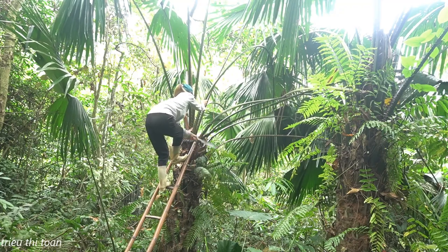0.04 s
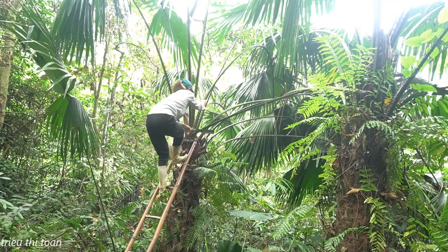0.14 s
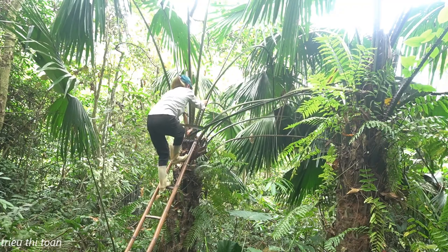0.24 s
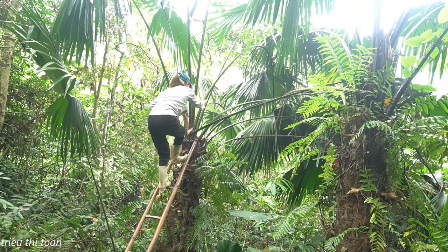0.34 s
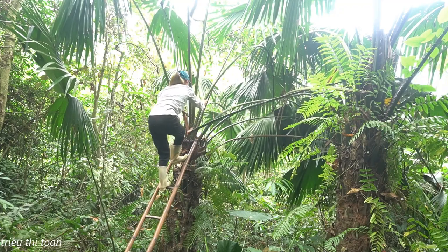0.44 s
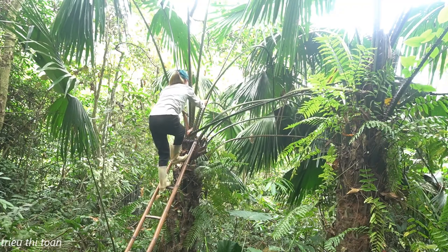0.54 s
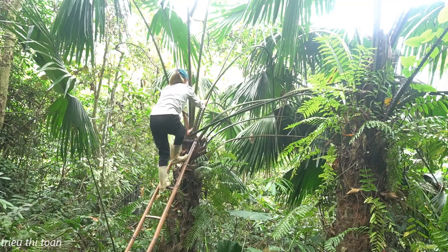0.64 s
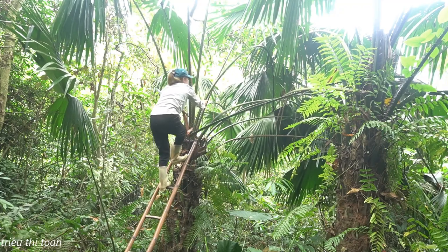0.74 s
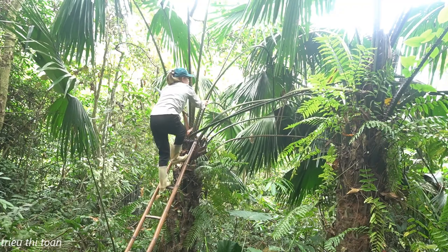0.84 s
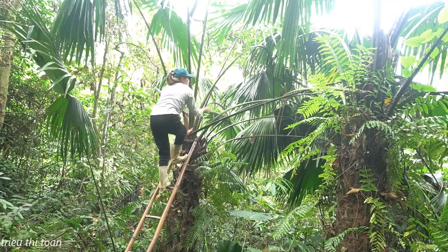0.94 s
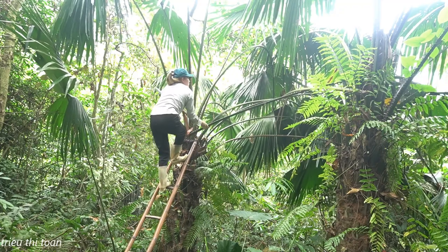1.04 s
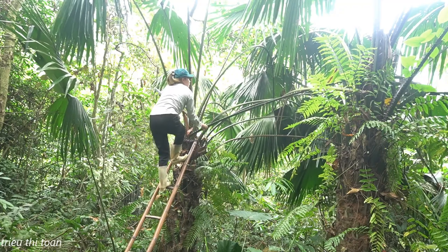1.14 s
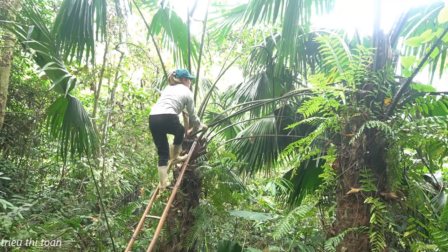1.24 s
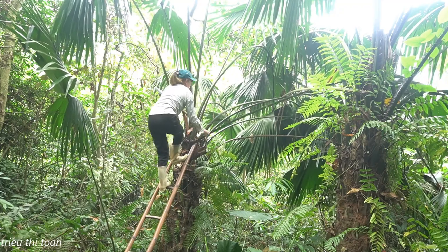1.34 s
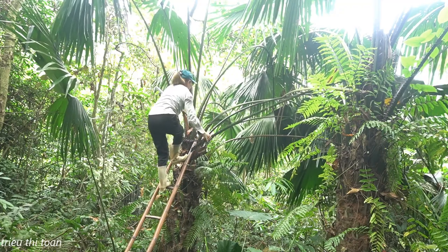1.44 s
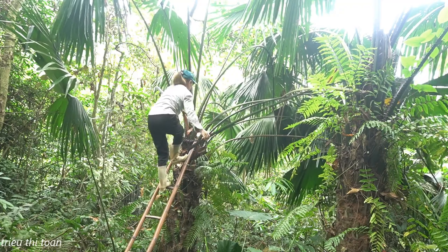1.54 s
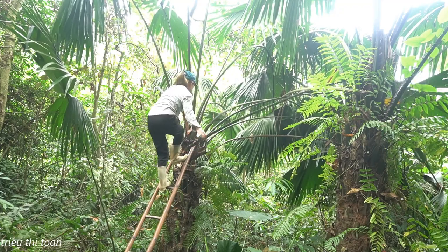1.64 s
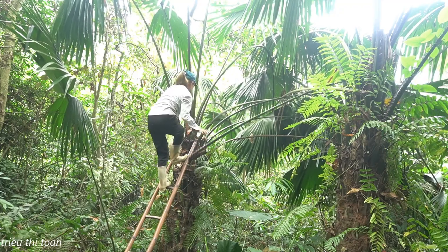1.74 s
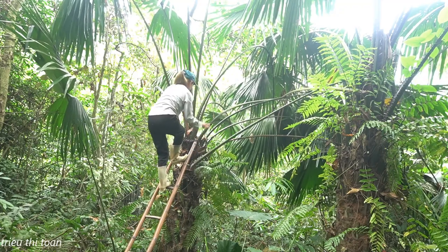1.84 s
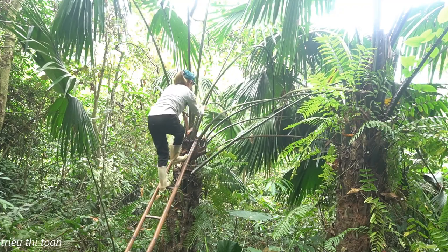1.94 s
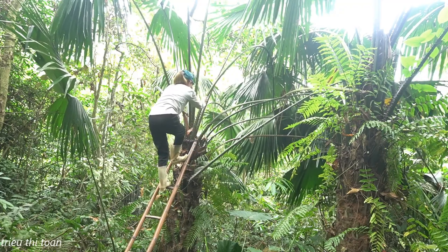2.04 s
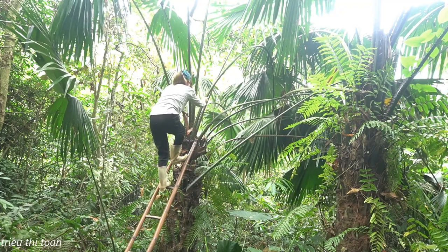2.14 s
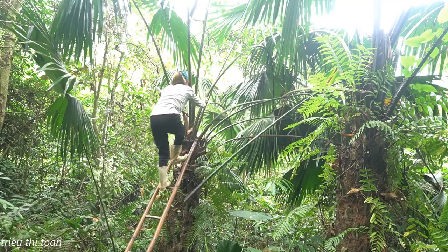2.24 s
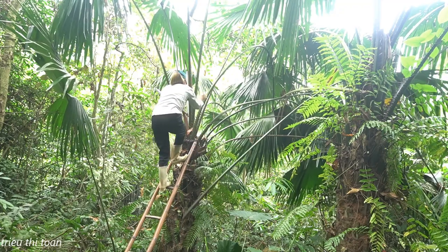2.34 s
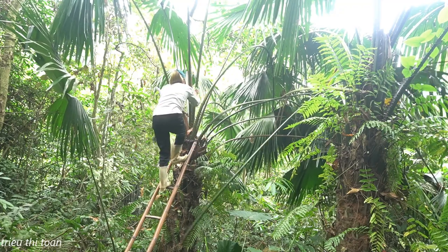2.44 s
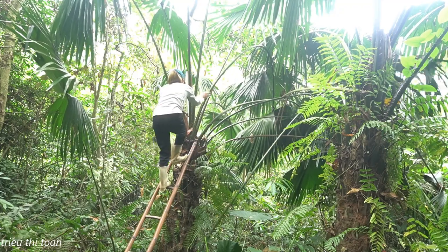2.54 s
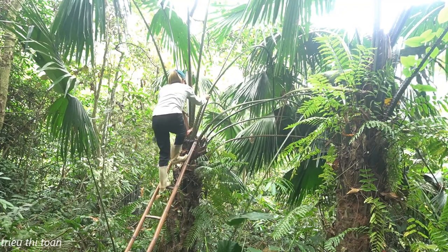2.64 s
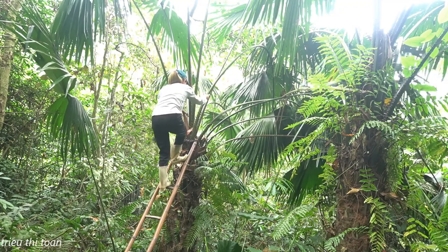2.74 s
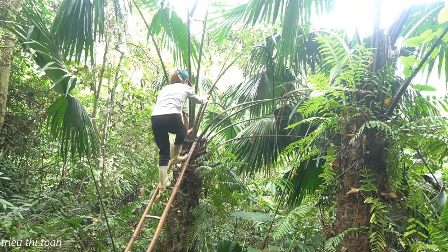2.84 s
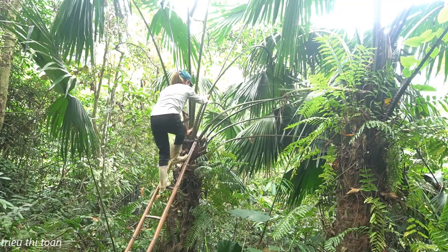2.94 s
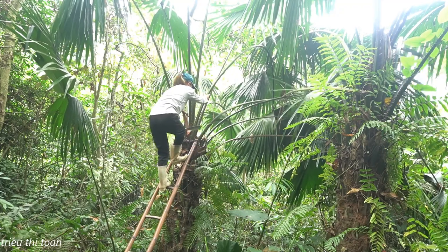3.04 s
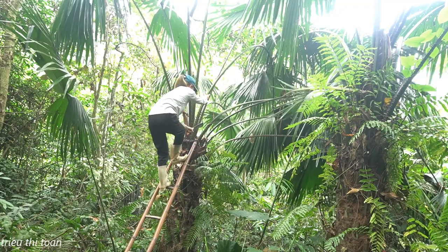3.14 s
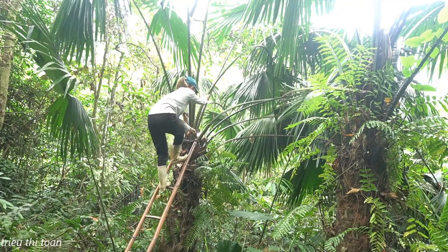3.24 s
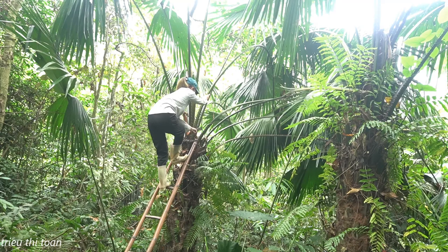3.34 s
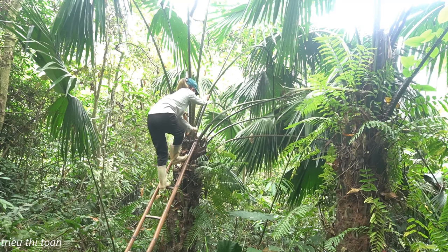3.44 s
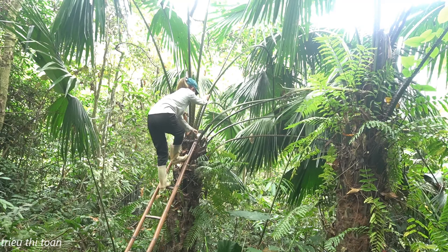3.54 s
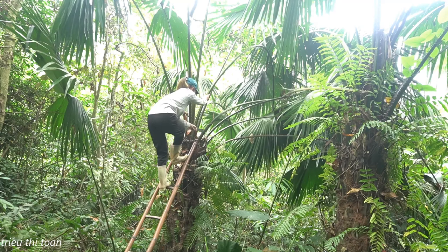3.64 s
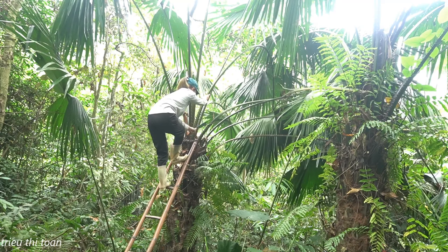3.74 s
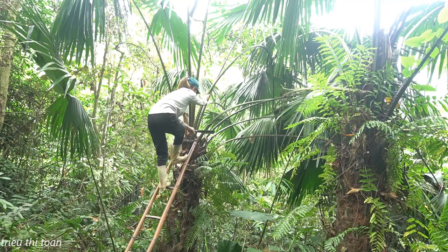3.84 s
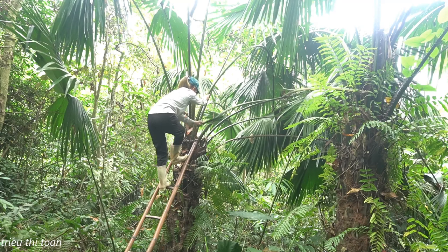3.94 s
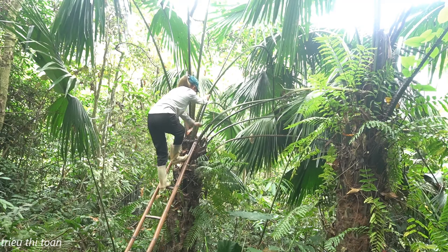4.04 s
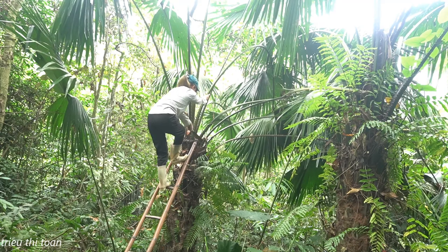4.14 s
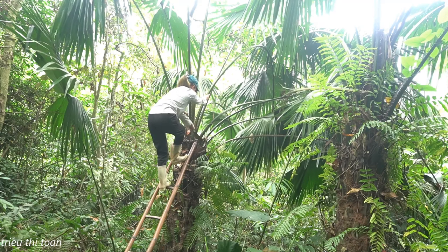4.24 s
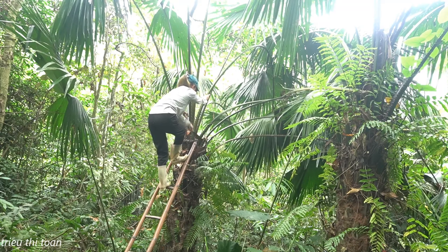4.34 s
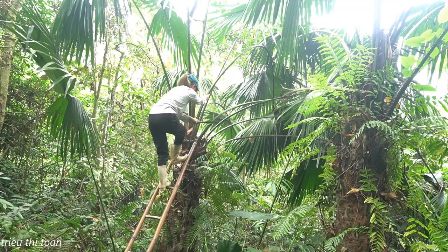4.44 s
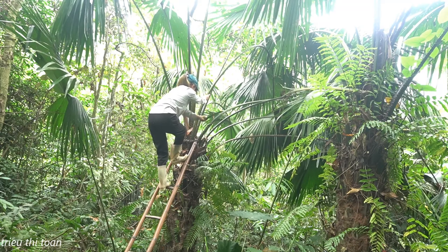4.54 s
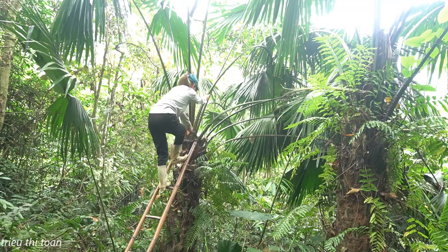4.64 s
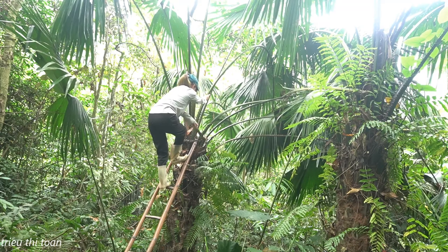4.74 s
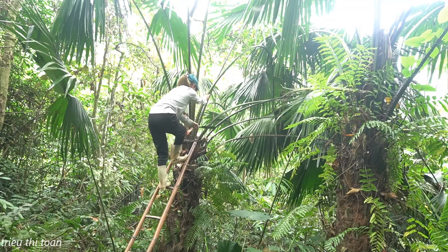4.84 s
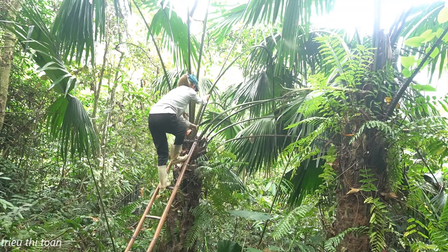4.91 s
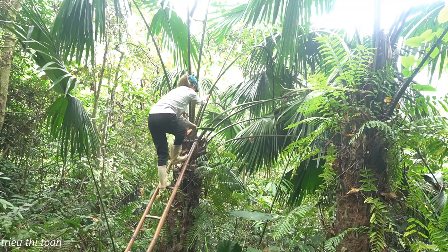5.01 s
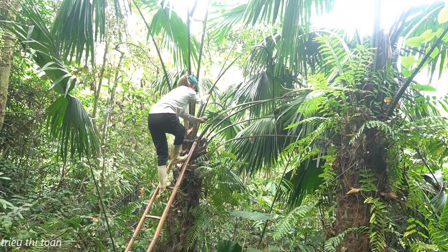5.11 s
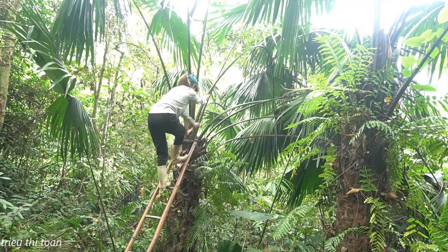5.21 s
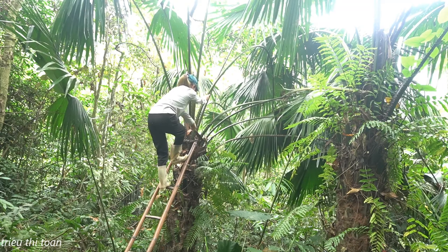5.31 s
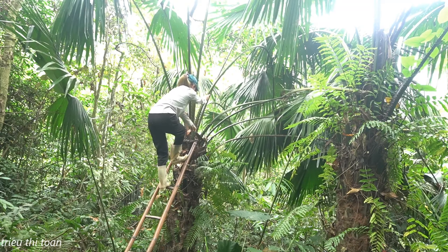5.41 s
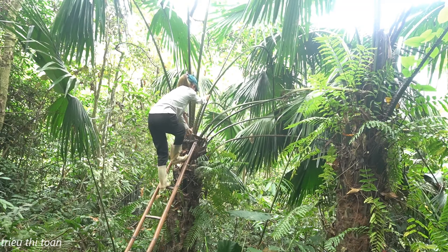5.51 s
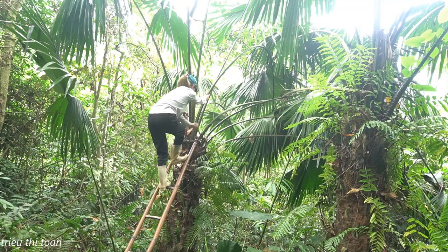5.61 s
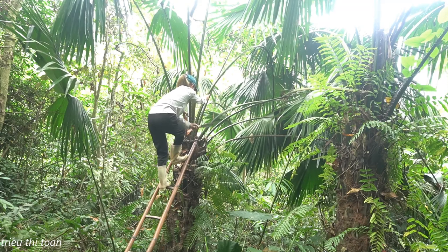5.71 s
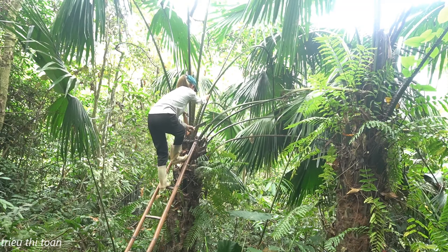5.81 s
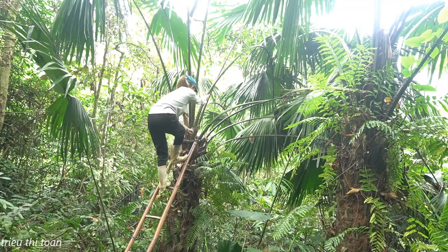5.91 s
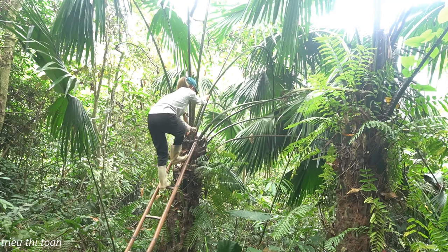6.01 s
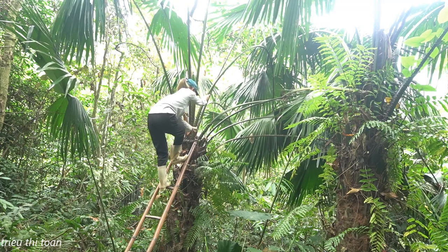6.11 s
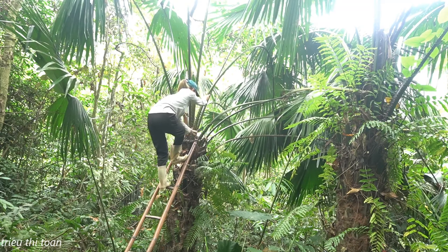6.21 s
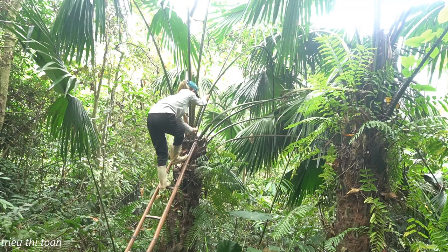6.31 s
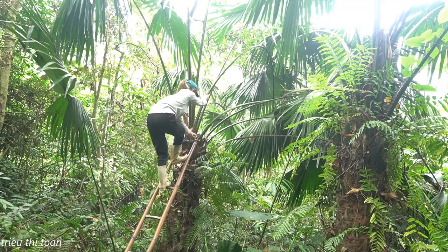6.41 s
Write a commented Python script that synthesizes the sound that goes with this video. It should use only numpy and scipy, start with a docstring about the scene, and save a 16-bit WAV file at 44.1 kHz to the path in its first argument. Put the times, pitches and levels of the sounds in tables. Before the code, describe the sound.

Outdoor stereo pickup among dense palms. Dry leaves drag and tick, fade, then rustle harder until a frond crashes down, leaning slightly right. After a short settling, sharp machete-like blows bite fibrous wood, each a bright tick, splitting crackle and hollow knock with a short leafy tail. Between late blows the blade rubs and small knocks clatter. Faint hiss, shrill insects and two distant early whistles sit underneath.

```python
"""Palm cutting in a forest

A worker on a ladder frees a palm frond, which slides and crashes down through the leaves (clumped grains
and stalk modes), then hacks at the next stalk with a long blade (tick, splitting fibres, steel ring).
Knocks excite stalk modes, snaps and swishes are bursts of resonant noise; both leave a dense decaying tail.
Behind lie filtered-noise air, two resonant bands of insects and two far gliding whistles."""
import sys
import numpy as np
from scipy import signal
from scipy.fft import rfft, irfft, next_fast_len
from scipy.io import wavfile

SR = 44100
rng = np.random.default_rng(int(sys.argv[2]) if len(sys.argv) > 2 else 0)


def gain_from_decibels(decibels):
    """Convert decibel values to linear amplitude factors."""
    exponent = np.asarray(decibels, float) / 20
    return 10 ** exponent


def to_wav(s):
    """Save 16-bit WAV."""
    ch = np.atleast_2d(s).T  # columns
    pcm = np.round(np.clip(ch, -1, 1) * 32767)  # PCM
    wavfile.write(sys.argv[1], SR, pcm.astype(np.int16))


N = 285327

# Forest air, a noise spectrum: pitch_hz [Hz], density_db [dB per Hz, relative]
AIR_SPECTRUM = [(20, -10), (50, -18), (86, -4.5), (220, -6), (480, -5), (1140, -4.5), (1500, -9),
                (3300, -9), (6500, -11), (8500, -13), (11000, -17), (15500, -13)]
# Insect bands, lower then higher: pitch_hz [Hz], width_hz [Hz, of each of two resonances in series]
INSECT_BANDS = [(8300, 1300), (13700, 1400)]
# Higher insects, which come and go: time_s [s], level_db [dB rms]
HIGH_INSECT_LEVEL = [(0, -76), (1.3, -82), (1.9, -55), (2.3, -53), (3.2, -64), (4.3, -77), (5.75, -61),
                     (5.9, -58), (6.47, -55)]
# Far whistles: start_s [s], loudest_s [s], end_s [s], first_hz [Hz], level_db [dB rms when loudest]
WHISTLES = [(0.506, 0.744, 0.83, 1380, -58), (1.031, 1.2, 1.37, 2830, -59)]
# Scattered tail: pitch_hz [Hz], t60_s [s], level_db [dB, relative]
SCATTER_TAIL = [(80, 0.84, -33), (212, 0.37, -11.5), (560, 0.32, -11.5), (1370, 0.49, -20),
                (3800, 0.75, -14), (10200, 0.36, -4.5)]
# Likeness of left and right, for near and for distant sound: pitch_hz [Hz], likeness [0 to 1]
NEAR_LIKENESS = [(60, 0.99), (180, 1), (550, 1), (1650, 0.94), (4970, 0.57), (15000, 0.075)]
AIR_LIKENESS = [(60, 1), (240, 0.79), (950, 0.1), (3770, 0.32), (15000, 0.22)]
# Balance of the dying tails: pitch_hz [Hz], left_over_right_db [dB]
TAIL_BALANCE = [(60, 0), (380, -1), (2380, -2.5), (15000, -1.0)]
# Frond dragging through foliage: time_s [s], rustle_db [dB], rattle_db [dB against the rustle]
DRAG_LEVELS = [(0.0, -50, -1), (0.03, -43.5, -2), (0.08, -49, -5), (0.25, -48, -5.5), (0.94, -72, -1),
               (1.35, -68, 0), (1.38, -44.5, 2), (1.42, -48, -3), (1.66, -50, -3.5), (1.82, -43, -2.5),
               (2.11, -47.5, -3.5), (2.18, -38, -5), (2.26, -47.5, -3), (2.46, -37.5, -4), (2.51, -32.5, 1),
               (2.74, -21, -3), (3.06, -44.5, -5), (3.07, -42, -7.5), (3.11, -49.5, -3), (3.4, -57.5, -7.5)]
# Balance of the frond, which falls to the right: pitch_hz [Hz], left_over_right_db [dB]
DRAG_BALANCE = [(60, -1), (180, 0.5), (550, -0.5), (1650, -4), (4970, -5.5), (15000, -3)]
# Modes of the loose frond's hollow stalk: pitch_hz [Hz], width_hz [Hz], level_db [dB, relative]
FROND_MODES = [(320, 220, -13), (540, 106, -0.5), (810, 100, -4), (1050, 246, 1.5), (1350, 180, -4),
               (1826, 280, -4.5), (2306, 810, -17)]
# Leaf rustle, a spectrum: pitch_hz [Hz], density_db [dB per Hz, relative]
LEAF_SPECTRUM = [(880, -10.5), (1500, -0.5), (1580, -6), (1900, -3), (2540, -3), (3030, -1.5), (4990, 0.5),
                 (11200, -1.5), (15500, -3)]
# Blade worked loose from the cut in strokes: start_s [s], length_s [s], level_db [dB, each of two parts]
RUB_STROKES = [(5.34, 0.063, -50), (5.387, 0.063, -40.5), (5.48, .072, -43.5)]
# Clearest snaps, ticks and short swishes of leaflets and fibres:
# start_s [s], level_db [dB, relative], pitch_hz [Hz], t60_s [s], left_over_right_db [dB, treble]
SNAPS_AND_SWISHES = [(0.1514, -37, 3480, 0.03, -9), (0.227, -30.5, 4540, 0.02, 5),
                     (0.251, -31, 5300, 0.019, -9), (0.3277, -32, 3370, 0.016, -15),
                     (0.3567, -30, 3330, 0.0076, -4), (0.7994, -41, 8900, 0.22, -6),
                     (1.3725, -32, 2540, 0.015, -8), (1.493, -34, 2610, 0.031, -12),
                     (1.745, -35, 7450, 0.029, -17), (1.8864, -30, 3270, 0.036, -3),
                     (2.4938, -16.5, 3450, 0.028, -7), (2.538, -25, 3820, 0.019, -5.0),
                     (2.594, -12, 4500, 0.029, -8), (2.7432, -12.5, 8250, 0.028, 5),
                     (3.0685, -21.5, 4370, 0.019, -8), (3.0944, -27, 3540, 0.013, -8.5),
                     (3.1744, -35, 3720, 0.023, -5), (3.1911, -35.5, 8400, 0.022, -6),
                     (3.26, -35, 8550, 0.028, -1), (3.275, -33, 4000, 0.019, -4),
                     (3.553, -28, 12300, 0.025, 1.0), (4.2393, -33, 8140, 0.015, 0.5),
                     (4.998, -28.5, 5100, 0.014, -8), (5.206, -28, 4830, 0.022, 5),
                     (5.3504, -32, 7500, 0.026, -6), (5.408, -27, 7000, 0.019, 1.0),
                     (5.481, -27, 6860, 0.017, 3), (5.5, -21, 7500, 0.0052, 3),
                     (5.788, -31.5, 7360, 0.036, -1), (5.9294, -31.5, 9800, 0.021, 0.0),
                     (6.081, -30, 13300, 0.022, 0.5), (6.314, -28.5, 11900, 0.011, 2.5),
                     (6.4332, -26.5, 10000, 0.048, -1.0)]
# Knocks on stalks and trunk:
# start_s [s], level_db [dB, relative], centre_hz [Hz], t60_s [s, at the centre], trunk_db [dB against level_db]
KNOCKS = [(0.028, -23.5, 590, 0.17, -23), (0.057, -31, 510, 0.16, -30), (0.61, -34.5, 1050, 0.051, -19),
          (1.366, -25, 560, 0.1, -24), (1.377, -26, 517, 0.32, -28), (1.436, -30, 1120, 0.04, -35),
          (1.489, -20, 524, 0.1, -25), (1.528, -24, 476, 0.17, -29), (2.491, -19.5, 1900, 0.45, -45),
          (2.69, -12.5, 1000, 0.19, -47), (3.414, -32.5, 980, 0.04, -22), (3.462, -16, 490, 0.091, -21.5),
          (4.068, -14, 1680, 0.067, -23), (4.077, -14.5, 790, 0.099, -22), (4.636, -11, 650, 0.12, -17),
          (5.215, -18.5, 1830, 0.14, -17.5), (5.223, -6.5, 580, 0.067, -24),
          (5.567, -17.5, 540, 0.066, -29), (5.646, -37.5, 576, 0.041, -15), (5.703, -37, 1070, 0.036, -19),
          (5.856, -22.5, 600, 0.092, -33), (5.933, -36.5, 597, 0.17, -14.5),
          (6.002, -17.5, 524, 0.094, -23.5), (6.086, -28, 700, 0.092, -21), (6.299, -28, 560, 0.13, -37),
          (6.347, -16.5, 646, 0.13, -27.5), (6.429, -36, 900, 0.059, -13)]
# Modes of the fibrous stalk: pitch_hz [Hz], width_hz [Hz], level_db [dB, relative]
STALK_MODES = [(260, 61, -5.5), (351, 30, -5), (421, 47, 3.5), (511, 72, 6), (604, 63, 4), (713, 60, -0.5),
               (870, 150, 5.5), (1092, 96, 5.5), (1154, 59, 2.5), (1295, 130, 2), (1417, 134, 2.5),
               (1754, 150, 4), (2320, 1200, 1)]
# Trunk band: its low and high edges [Hz]
TRUNK_BAND = (79.4, 341)
# Blade biting into the stalk: start_s [s], level_db [dB, relative], crack_t60_s [s],
# ring_db [dB against level_db], crown_db [dB against level_db]
CHOPS = [(3.438, -25, 0.022, -20, -33), (3.4593, -4, 0.067, -23, -21), (4.0659, -5, 0.023, -15, -15.5),
         (4.6287, 0, 0.013, -26.5, -16.5), (5.216, -2.5, 0.023, -18.5, -16), (5.5517, -20, 0.039, -23, -21),
         (5.5568, -4, 0.09, -20.5, -19), (5.856, -29, 0.026, -17, -11), (6.0028, -18, 0.022, -15, -18),
         (6.3018, -20.5, 0.033, -42, -30), (6.346, -3, 0.1, -20.5, -19.5)]
# Splitting fibres, a spectrum: pitch_hz [Hz], density_db [dB per Hz, relative]
CRACK_SPECTRUM = [(710, -3.5), (1200, -10.5), (1710, -2.5), (4720, -11), (5260, -7), (6310, 0),
                  (15500, 1.5)]
# Modes of the steel blade: pitch_hz [Hz], level_db [dB, relative], t60_s [s]
BLADE_MODES = [(1820, 0, .045), (2830, -9, .02), (3320, -8, .02), (3900, -7, .02), (4320, -7, .02),
               (5180, 3, .02), (6080, -8, .015), (8350, -5, .02), (9900, -7, .06), (11400, -8, .07),
               (13500, -8, .025)]
# Crown leaves hissing after a blow: pitch_hz [Hz], t60_s [s], level_db [dB, relative]
CROWN_TAIL = [(700, 0.089, -5), (1190, 0.39, -3), (2030, 0.34, -6.5), (3520, 0.3, -2.5), (5970, 0.46, -7),
              (10000, 0.37, -5), (15000, 0.55, -13.5)]

AIR_DB, LOW_INSECT_DB = -49.5, -59.5   # rms levels
WHISTLE_SAG_PER_S = 0.05   # share of the first pitch lost each second
WHISTLE_SWELL_DB, WHISTLE_WAVER_DB = 10.5, 2.5   # rise to the loudest point; spread of the waver
TIPS_DB, TIPS_WANDER_DB = -5, 5   # thin leaf tips against the rustle; spread of their wandering
RUB_EDGE_S = 0.0071   # fade at each end of a stroke
KNOCK_RISE_S = 0.00235   # rise of a mode at the knock's centre pitch
CHOP_PAN_DB = 3   # left over right, treble


def rms_one(x):
    """Normalisation: scale to rms 1."""
    return x / np.sqrt(np.mean(x ** 2) + 1e-20)


def in_time(rows):
    """Linear interpolation: columns of a time table at every sample."""
    times_s, *columns = np.transpose(rows)
    t = np.arange(N) / SR
    return [np.interp(t, times_s, column) for column in columns]


def at_hz(points, hz, order=1):
    """Logarithmic frequency scale: read one table column at the given frequencies."""
    points = np.array(points)
    return np.interp(np.log(hz + 1), np.log(points[:, 0]), points[:, order])


def colour(x, spectrum):
    """Linear filtering: weight the Fourier components by a spectrum in dB."""
    n = next_fast_len(x.shape[-1])
    gain = gain_from_decibels(at_hz(spectrum, np.fft.rfftfreq(n, 1 / SR)))
    return irfft(rfft(x, n) * gain, n)[..., :x.shape[-1]]


def stereo(pair, likeness, balance=((100, 0), (200, 0))):
    """Interchannel coherence: mix two unrelated sounds to a given likeness and balance."""
    n = next_fast_len(pair.shape[-1])
    hz = np.fft.rfftfreq(n, 1 / SR)
    mid, side = rfft(pair, n)
    alike = np.clip(at_hz(likeness, hz), 0, 1)
    lean = gain_from_decibels(at_hz(balance, hz) / 2)
    common = np.sqrt((1 + alike) / 2) * mid
    opposed = np.sqrt((1 - alike) / 2) * side
    both = np.array([(common + opposed) * lean, (common - opposed) / lean])
    return irfft(both, n)[:, :pair.shape[-1]]


def band(x, low_hz, high_hz):
    """Band-pass filtering with gentle slopes."""
    edges = [low_hz, min(high_hz, 0.45 * SR)]
    return signal.sosfilt(signal.butter(2, edges, "band", fs=SR, output="sos"), x)


def resonate(x, hz, width_hz):
    """Damped resonance: a pole pair of given bandwidth, near unit gain at its peak."""
    r = np.exp(-np.pi * width_hz / SR)
    feedback = [1, -2 * r * np.cos(2 * np.pi * hz / SR), r * r]
    return signal.lfilter([(1 - r * r) / 2, 0, (r * r - 1) / 2], feedback, x)


def drift(rate_hz):
    """Low-passed noise: a random wander of spread 1."""
    r = np.exp(-2 * np.pi * rate_hz / SR)
    noise = rng.standard_normal(N + SR)
    return rms_one(signal.lfilter([1], [1, -2 * r, r * r], noise)[SR:])   # drops the settling second


def grains(shape, per_s, spread_db):
    """Shot noise: random clicks, few large and many small, of rms 1."""
    sizes = gain_from_decibels(spread_db * np.minimum(rng.exponential(1, shape), 5))
    signs = rng.choice([-1, 1], shape)
    return rms_one(sizes * signs * (rng.random(shape) < per_s / SR))


def swell(size, rise_s, t60):
    """Exponential build-up and decay: falls by 60 dB in t60, with its top at 1."""
    t = np.arange(size) / SR
    shape = (1 - np.exp(-t / max(rise_s, 1e-4))) * gain_from_decibels(-60 * t / max(t60, 0.004))
    return shape / shape.max()


def add(out, sound, start_s, level_db, pan_db=0):
    """Superposition with diffraction: treble leans to one side, bass stays even between them."""
    at, sound = round(start_s * SR), sound * gain_from_decibels(level_db)
    low = signal.lfilter([0.15], [1, -0.85], sound)
    sides = gain_from_decibels(np.array([[0.5], [-0.5]]) * pan_db)
    out[:, at:at + sound.shape[-1]] += (low + (sound - low) * sides)[:, :N - at]


def dying_noise(table, rise_s):
    """Frequency-dependent decay: stereo noise in half-octave bands, each with its own level and t60."""
    size, tail = SR // 2, 0
    edges = 50 * 2 ** np.arange(0, 8.6, 0.5)
    t, white = np.arange(size) / SR, rng.standard_normal((2, 2, size))
    for k, (low, high) in enumerate(zip(edges, edges[1:])):
        hz = np.sqrt(low * high)
        t60, level_db = at_hz(table, hz), at_hz(table, hz, order=2)
        tail = tail + band(white[k % 2], low, high) * gain_from_decibels(level_db - 60 * t / t60)
    return stereo(tail * (1 - np.exp(-t / rise_s)), NEAR_LIKENESS, TAIL_BALANCE)


def forest():
    """Filtered noise: smooth far hiss and rumble, with insects as two narrow resonant bands."""
    air = rms_one(colour(rng.standard_normal((2, N)), AIR_SPECTRUM))
    out = gain_from_decibels(AIR_DB + 0.5 * drift(3.8)) * air
    levels = [LOW_INSECT_DB, *in_time(HIGH_INSECT_LEVEL)]
    for level_db, (hz, width_hz) in zip(levels, INSECT_BANDS):
        buzz = resonate(rng.standard_normal((2, N)), hz, width_hz)
        buzz = resonate(buzz, hz, width_hz)
        out += gain_from_decibels(level_db + drift(11)) * rms_one(buzz)
    return stereo(out, AIR_LIKENESS)


def whistles():
    """Frequency and amplitude modulation: thin far notes sag in pitch, swell and waver in level."""
    out, t = np.zeros(N), np.arange(N) / SR
    for start_s, loudest_s, end_s, first_hz, level_db in WHISTLES:
        hz = first_hz * (1 - WHISTLE_SAG_PER_S * (t - start_s))
        fade = np.clip(np.minimum(t - start_s, end_s - t) / 0.015, 0, 1)
        below_top = np.interp(t, [start_s, loudest_s, end_s], [1, 0, 1])
        note_db = level_db - WHISTLE_SWELL_DB * below_top + WHISTLE_WAVER_DB * drift(24)
        out += np.sqrt(2) * gain_from_decibels(note_db) * fade * np.sin(2 * np.pi * np.cumsum(hz) / SR)
    return out


def scatter(x):
    """Multiple scattering: trunks and leaves return a dense tail that dies band by band."""
    response = dying_noise(SCATTER_TAIL, rise_s=0.0014) / np.sqrt(SR / 100)
    return signal.fftconvolve(x.mean(axis=0)[None], response, axes=1)[:, :N]


def drag():
    """Friction as shot noise: leaflets scrape in clumps; the stalk rattles in its modes at the same bumps."""
    leaf_db, rattle_db = in_time(DRAG_LEVELS)
    stalk_db = leaf_db + rattle_db
    tips_db = TIPS_DB + TIPS_WANDER_DB * drift(7.3)
    sliding = np.arange(N) < DRAG_LEVELS[-1][0] * SR
    bumps = drift(7.3)   # dB, shared by all parts

    taps = grains((2, N), 1200, 3.0)
    stalk = sum((-1) ** k * gain_from_decibels(db) * resonate(taps, hz, width_hz) / np.sqrt(width_hz)
                for k, (hz, width_hz, db) in enumerate(FROND_MODES))
    thump = rms_one(band(band(taps, *TRUNK_BAND), *TRUNK_BAND))
    stalk = rms_one(stalk) + gain_from_decibels(-30.5) * thump

    leaves = colour(grains((2, N), 8000, 2.8), LEAF_SPECTRUM)
    dull = signal.lfilter(*signal.butter(1, 7500, fs=SR), leaves)
    dull, tips = rms_one(dull), rms_one(leaves - dull)

    sound = gain_from_decibels(stalk_db + bumps) * stalk
    sound = sound + gain_from_decibels(leaf_db + 1.6 * bumps + 0.8 * drift(51)) * dull
    sound = sound + gain_from_decibels(leaf_db + tips_db + 0.71 * bumps + 0.79 * drift(60)) * tips
    return stereo(sound * sliding, NEAR_LIKENESS, DRAG_BALANCE)


def rub():
    """Sliding friction, steel on fibre: uneven grit in one high resonance, with a thin hiss added."""
    t, level = np.arange(N) / SR, 0
    for start_s, length_s, level_db in RUB_STROKES:
        inside_s = np.minimum(t - start_s, start_s + length_s - t)
        level = level + gain_from_decibels(level_db) * np.clip(inside_s / RUB_EDGE_S, 0, 1)
    grit = grains((2, N), 6000, 4.2)
    body = rms_one(resonate(resonate(grit, 7200, 2500), 7200, 2600))
    hiss = rms_one(band(grit, 7500, 15000))
    return stereo(level * gain_from_decibels(2.3 * drift(40)) * (body + hiss), NEAR_LIKENESS)


def snaps_and_swishes():
    """Resonant noise bursts: short snaps, ticks and swishes, each with a broad resonance of its own."""
    out, size = np.zeros((2, N)), SR // 5
    for start_s, level_db, hz, t60, pan_db in SNAPS_AND_SWISHES:
        noise = rng.standard_normal(size)
        tone = rms_one(resonate(noise, hz, 0.25 * hz))
        tone = tone + gain_from_decibels(-8) * rms_one(band(noise, 2000, 13000))
        add(out, tone * swell(size, t60 / 30, t60), start_s, level_db - 10.5, pan_db)
    return out


def knocks():
    """Modal excitation: a clatter drives stalk modes near its pitch, high ones first; the trunk lags."""
    out, size = np.zeros((2, N)), SR // 3
    for start_s, level_db, centre_hz, t60, trunk_db in KNOCKS:
        contacts, body = grains(size, 2500, 3.86), 0
        contacts[round(KNOCK_RISE_S * SR)] += gain_from_decibels(18)   # one hard contact
        for k, (hz, width_hz, mode_db) in enumerate(STALK_MODES):
            ratio = centre_hz / hz
            push = contacts * swell(size, KNOCK_RISE_S * np.sqrt(ratio), t60 * ratio ** 0.2)
            gain = (-1) ** k * gain_from_decibels(mode_db - 3.9 * np.log2(ratio) ** 2)
            body = body + gain * resonate(push, hz, width_hz) / np.sqrt(width_hz)
        add(out, body / np.abs(body).max(), start_s, level_db - 1.5)

        late = swell(size, 0.0033, 2.1 * t60)
        thump = band(band(rng.standard_normal(size) * late, *TRUNK_BAND), *TRUNK_BAND)
        add(out, rms_one(thump) * np.sqrt(np.mean(late ** 2)), start_s, level_db + trunk_db)
    return out


def chops():
    """Impact and fracture: a sharp tick, splitting fibres, ringing steel modes and a shaken crown of leaves."""
    out, size = np.zeros((2, N)), SR // 4
    t = np.arange(size) / SR
    for start_s, level_db, t60, ring_db, crown_db in CHOPS:
        fibres = rms_one(colour(grains(size, 13000, 3.4), CRACK_SPECTRUM))
        split = fibres * swell(size, 0.000081, t60) * gain_from_decibels(-14)
        split[:3] += gain_from_decibels(-4) * np.array([1, -1.2, 0.3])   # the tick
        ring = 0
        for hz, mode_db, mode_t60 in BLADE_MODES:
            strength_db, turn = 2 * rng.standard_normal(), rng.random()   # each blow excites modes anew
            decay = gain_from_decibels(mode_db + ring_db + strength_db - 60 * t / mode_t60)
            ring = ring + decay * np.sin(2 * np.pi * (hz * t + turn))
        add(out, split + ring, start_s, level_db, CHOP_PAN_DB)
        add(out, dying_noise(CROWN_TAIL, rise_s=0.00038), start_s, level_db + crown_db)
    return out


def scene():
    """Superposition: the forest, the falling frond, the blows, and the tail of knocks, snaps and swishes."""
    taps = knocks() + snaps_and_swishes()
    return forest() + whistles() + scatter(taps) + drag() + rub() + taps + chops()


def low_pass(x):
    """Removes everything above the highest recorded frequency."""
    return signal.sosfilt(signal.butter(12, 16970, fs=SR, output="sos"), x)


def record(dry):
    """Band limitation: the sound has thin bass and a steep top edge near 16 kHz."""
    mix = signal.sosfilt(signal.butter(2, 60, "high", fs=SR, output="sos"), dry)
    mix = signal.sosfilt(signal.cheby2(10, 30, 16000, fs=SR, output="sos"), mix)
    return low_pass(mix)


dry = scene()
out = record(dry)
to_wav(out)
```